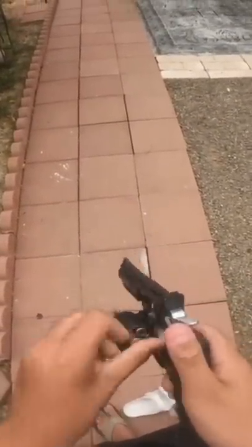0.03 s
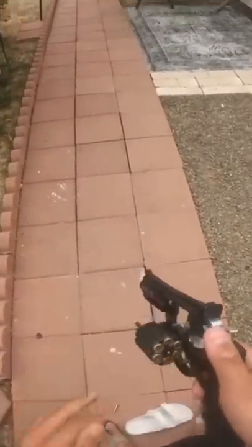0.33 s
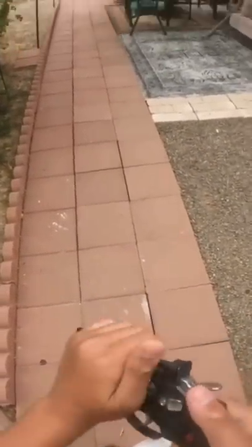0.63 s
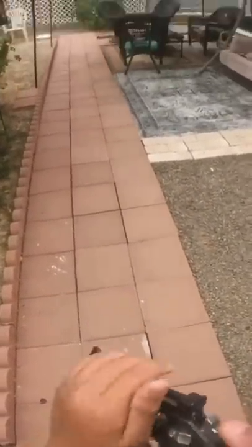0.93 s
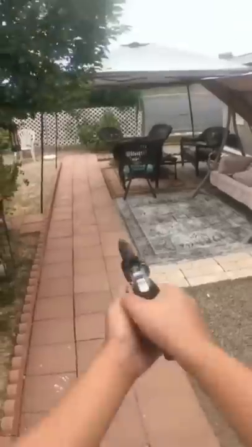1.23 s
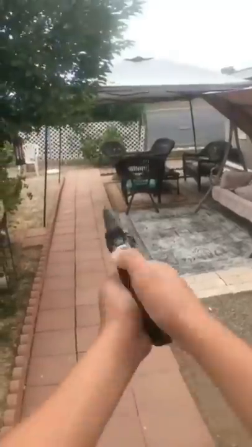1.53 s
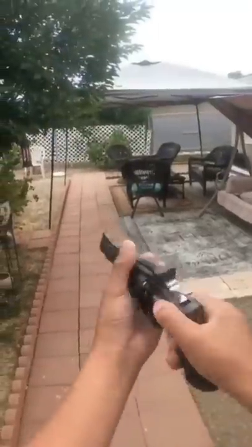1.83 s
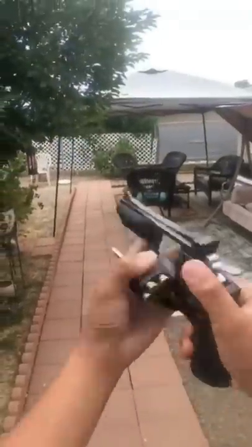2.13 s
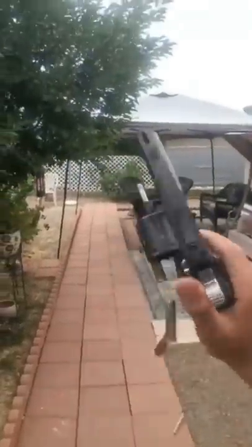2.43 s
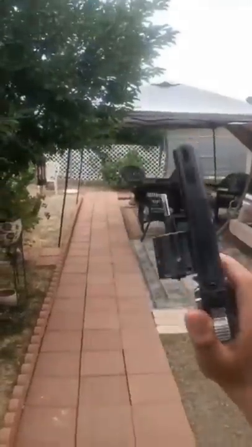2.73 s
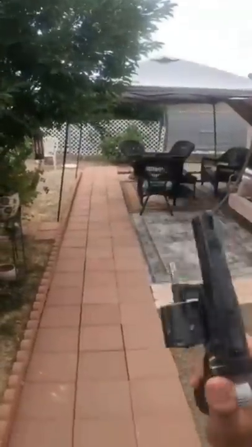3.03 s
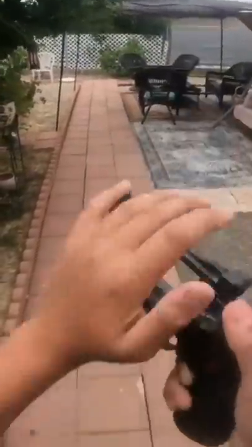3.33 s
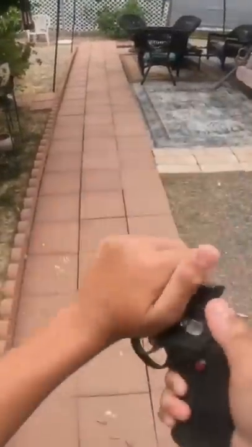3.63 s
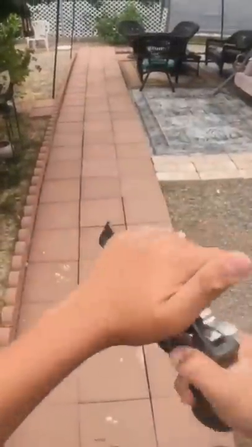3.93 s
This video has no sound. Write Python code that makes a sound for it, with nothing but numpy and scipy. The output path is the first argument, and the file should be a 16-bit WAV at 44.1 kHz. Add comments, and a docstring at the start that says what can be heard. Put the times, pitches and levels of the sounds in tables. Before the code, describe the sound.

A revolver clicks and scrapes close by, its cylinder snapping in sharply around 0.7 seconds, with another click near 1.1. More steel clicks from 1.7 build to a rattle around 2.2 as the cases are ejected. Three brass cases bounce and ring on paving from 2.7 to 3.4. The cylinder snaps shut at 3.6 with a low microphone bump. A low outdoor rumble continues throughout.

```python
"""Sharp steel clicks over a low outdoor rumble: a revolver is handled close by in a paved back yard.
Latch, cylinder and hammer strike and ring the frame; sliding parts stick and slip. A faint bird whistles.
The ejector rattles three cases out; they bounce, tumble and ring on the paving. The cylinder snaps shut.
The hand jolts the microphone twice; hands, ground and fences reflect gun and cases."""
import sys
import numpy as np
from scipy import signal
from scipy.fft import rfft, irfft, next_fast_len
from scipy.io import wavfile

SR = 44100
rng = np.random.default_rng(int(sys.argv[2]) if len(sys.argv) > 2 else 0)


def store_wav(level_fs):
    """Save 16-bit WAV to argv[1]."""
    pcm = np.round(np.clip(np.atleast_2d(level_fs), -1, 1) * 32767)
    wavfile.write(sys.argv[1], SR, pcm.T.astype(np.int16))


N = 176400

# outdoor rumble and hiss (frequency [Hz], relative level [dB])
AIR_SPECTRUM = [(13, -32.5), (22, 3), (60, -9), (157, -11), (271, -23.5), (450, -26.5), (724, -31),
                (978, -24), (1740, -36.5), (3830, -53.5), (4770, -47.5), (15000, -79.5)]
# steel parts meeting (time [s], contact time constant [s], level in each of four bands [dB])
STEEL_CLICKS = [(0.1084, 0.0014, -37, -25.5, -31, -41.5), (0.1306, 0.0013, -44, -32.5, -45.5, -45),
                (0.2012, 0.0024, -34.5, -38.5, -36, -37), (0.2425, 0.0054, -39.5, -35, -36.5, -42),
                (0.2997, 0.00097, -34.5, -29.5, -34.5, -44), (0.3339, 0.0011, -53.5, -36.5, -47, -51),
                (0.626, 0.0029, -32, -36, -41, -49), (0.645, 0.0014, -27, -24, -17.5, -28.5),
                (0.6495, 0.0039, -30.5, -27.5, -33, -38), (0.7083, 0.0036, -26, -23, -18.5, -48),
                (0.7122, 0.0022, -33, -26, -26, -28), (0.9688, 0.0012, -45, -36, -45, -59),
                (0.9953, 0.0024, -41.5, -40, -34, -34), (1.0734, 0.00025, -28.5, -26, -22.5, -27),
                (1.7173, 0.0014, -44.5, -31, -31, -39.5), (1.872, 0.0022, -31.5, -32.5, -25, -33.5),
                (1.9568, 0.0014, -38, -35.5, -37, -41), (1.9655, 0.004, -41.5, -57.5, -35.5, -46),
                (2.029, 0.00034, -38, -44, -31, -50), (2.096, 0.00066, -42, -39.5, -30.5, -53),
                (2.1091, 0.00072, -44.5, -35, -33, -27), (2.1163, 0.0061, -32, -30, -23, -34),
                (2.189, 0.003, -25, -31, -41, -49), (2.1931, 0.0047, -23.5, -26.5, -27, -36.5),
                (2.2388, 0.0019, -32, -32.5, -39, -48), (2.262, 0.0027, -37, -41, -30.5, -40),
                (2.2759, 0.0024, -31.5, -27.5, -28.5, -31), (2.2838, 0.002, -28, -26.5, -33, -32),
                (2.3056, 0.0031, -31.5, -28.5, -27, -35.5), (2.3588, 0.001, -39.5, -36.5, -39, -51),
                (2.385, 0.0036, -37, -32.5, -33.5, -46), (2.4924, 0.0023, -44, -40, -46, -51.5),
                (3.473, 0.00099, -40, -35.5, -36.5, -60), (3.5019, 0.0037, -27, -29, -24, -31),
                (3.5857, 0.0026, -24.5, -26.5, -19.5, -37), (3.5947, 0.0031, -27.5, -25.5, -19.5, -26)]
# the four bands (low edge [Hz], high edge [Hz])
BANDS_HZ = [(760, 1650), (1750, 3500), (3600, 7600), (8300, 13500)]
# hand-damped frame (frequency [Hz], relative level [dB], t60 [s])
FRAME_MODES = [(1105, -6.5, .018), (1866, -15, 0.046), (2144, -0.5, 0.019), (4330, 3, 0.0063),
               (6380, -4.5, .018)]
# metal scraping (time [s], length [s] capped at 0.5, level [dB], tilt [dB/octave])
SCRAPES = [(0.149, 0.19, -50, 5), (0.57, 0.058, -41.5, -3), (0.681, 0.065, -37.5, -2),
           (0.851, 0.37, -46, -1.5), (1.057, .009, -33.5, 7.5), (1.48, 0.013, -48, 2.5),
           (1.758, .014, -43.5, -3), (1.821, 0.31, -47, 2), (2.016, 0.027, -37, 0),
           (2.186, 0.26, -40.5, 2.5), (2.266, 0.068, -33, 1.5), (3.168, 0.73, -45, -3),
           (3.566, 0.038, -26, 1), (3.933, 0.015, -41.5, -6.5)]
# scrape before tilt (frequency [Hz], relative level [dB])
SCRAPE_SPECTRUM = [(400, -22.5), (1300, -0.5), (6500, -4.5), (9000, -16), (12500, -13.5)]
# a light touch ticks, a hard push scrapes densely (scrape level [dB], slip spread [dB])
SLIP_SPREAD = [(-46, 9.5), (-36, 5.5)]
# latch and lock springs (time [s], frequency [Hz], level [dB])
SPRING_RINGS = [(.244, 2410, -26), (.61, 2440, -33), (1.898, 2180, -33), (1.957, 2137, -31)]
# bird (time [s], length [s], start pitch [Hz], middle pitch [Hz], end pitch [Hz], level [dB])
BIRD_WHISTLES = [(.455, .11, 5400, 6700, 6300, -55)]
# cylinder seating (time [s], level [dB])
SEAT_KNOCKS = [(.646, -28), (.711, -30), (3.595, -30.5)]
# hand jolting the microphone (time [s], level [dB])
MIC_JOLTS = [(1.077, -29), (3.596, -20)]
# ring per case (frequency [Hz], relative level [dB], t60 [s] before RING_T60_SCALE)
BRASS_MODES = { "first": [(1039, -11, .27), (1537, -10, .19), (2490, -4, .11), (4075, -6, .12),
               (4621, -3, .14), (4948, -1, .1), (6492, -3, .065), (7736, -6, .06)],
               "second": [(1608, -8, .25), (2612, -11, .2), (4295, -1, .13), (5197, -7, .13),
               (6794, -6, .08), (7456, -2, .1), (9865, -6, .085), (11220, -5, .05)],
               "third": [(1571, -4.5, .28), (2575, -2, .13), (4305, -8, .15), (4392, -9, .1),
               (6705, -1, .085), (8040, -6, .07), (11740, -7, .055)]}
# bounces per case (time [s], relative ring level [dB], tilt [dB/octave], relative tick level [dB])
CASE_BOUNCES = {"first": [(2.6667, -23, -2.5, -31), (2.672, -21, -3, -37.5), (2.7785, -18, -0.7, -17.5)],
                "second": [(2.8518, -19, 0, -20.5), (2.8905, -30.5, 7.5, -19.5),
                (2.9392, -28.5, -6.5, -18.5), (2.9984, -24, 1.5, -22), (3.1773, -31, -3.5, -34),
                (3.3906, -31, 0.5, -28), (3.4474, -40, -4.5, -36.5)], "third": [(3.0847, -19, -2, -23),
                (3.2037, -30.5, -4, -24.5), (3.2113, -23.5, -1, -30), (3.2379, -27.5, -5.5, -24),
                (3.2771, -31.5, 2.5, -27), (3.3449, -36, 8, -27)]}
# crowd of weak high overtones after a bounce (frequency [Hz], relative level [dB])
SHIMMER_SPECTRUM = [(800, -21.5), (7000, 12.5), (9000, 2), (12500, 1)]
# brass on stone (frequency [Hz], relative level [dB])
TICK_SPECTRUM = [(150, -3), (6000, 3), (12500, -4.5)]
# low knock per case (offset from the bounce's tick level [dB])
CASE_KNOCK_DB = {"first": -25, "second": -0.5, "third": 0.5}
# gun position (frequency [Hz], left minus right [dB])
GUN_PAN = [(5000, -2), (11000, 1.5)]
# gun's lag on the left (frequency [Hz], phase [rad])
GUN_LAG = [(1100, .22), (2100, 0.93), (4200, .1)]
# case position (frequency [Hz], left minus right [dB])
CASE_PAN = [(4000, 1.5), (11000, 3.2)]
# reflections (frequency [Hz], relative level [dB])
ECHO_SPECTRUM = [(200, -14), (1100, -0.5), (12000, -13)]

LEAD_S, RUB_DB, RUB_S = .008, -18, .0017  # parts rub just before they meet
RING_DB, RING_T60_SCALE, RING_RISE_S, MODE_SCATTER_DB = -1, .89, .00068, 1.5
TUMBLE_HZ, TUMBLE_DEPTH = 36, .45
SHIMMER_DB, SHIMMER_T60_S = -15.5, .16
TICK_DB, TICK_S = -1.5, .0017


def undb(db):
    """Decibels to gain."""
    return 10 ** (np.asarray(db) / 20)


def unit(x):
    """Scale to rms 1."""
    return x / np.sqrt(np.mean(x ** 2) + 1e-20)


def seconds(length_s):
    """Time axis."""
    return np.arange(int(length_s * SR)) / SR


def fade(t, t60_s):
    """Decay by 60 dB in t60_s."""
    return np.exp(-np.log(1000) * t / t60_s)


def burst(x):
    """Scale to the energy of 5 ms at rms 1."""
    return x * np.sqrt(.005 * SR / np.sum(x ** 2))


def add(out, start_s, x):
    """Mix x in at start_s."""
    i = max(int(start_s * SR), 0)
    out[i:i + len(x)] += x[:max(N - i, 0)]


def colour(x, points):
    """Minimum-phase filter through (frequency [Hz], gain [dB]) points."""
    size = next_fast_len(len(x) // 2 + 2048) * 2
    hz, db = np.array(points).T
    bins_hz = np.maximum(np.arange(size // 2 + 1) * SR / size, 1)
    gain = undb(np.interp(np.log(bins_hz), np.log(hz), db))
    cepstrum = irfft(np.log(gain))
    cepstrum[1:size // 2] *= 2
    cepstrum[size // 2 + 1:] = 0
    return irfft(rfft(x, size) * np.exp(rfft(cepstrum)))[:len(x)]


def ping(hz, t60_s):
    """One struck resonance."""
    t = seconds(.5)
    return np.sin(2 * np.pi * hz * t) * fade(t, t60_s)


def air(level_db=-39, sway_db=.4):
    """Outdoor rumble and faint hiss, gently swaying, wider in the treble."""
    mid, side = (unit(colour(rng.standard_normal(N), AIR_SPECTRUM)) for _ in range(2))
    side = colour(side, [(150, 20 * np.log10(.091)), (1200, 20 * np.log10(.42))])
    sway = np.interp(np.arange(N), np.linspace(0, N, num=24), rng.standard_normal(24))
    return undb(level_db + sway_db * sway) * np.array([mid + side, mid - side])


def grit(count, grain):
    """Noise of many tiny contacts of unequal size."""
    noise, log_size = rng.standard_normal((2, count))
    return noise * np.exp(grain * np.repeat(log_size, 12)[:count])


def contact(decay_s, rise_s=.00022):
    """Force of one blow: a light rub, then at LEAD_S a fast rise and dying chatter."""
    t = seconds(.06) - LEAD_S
    after_s = np.maximum(t, 0)
    blow = np.minimum(after_s / rise_s, 1) * np.exp(-after_s / decay_s)
    rub = undb(RUB_DB) * np.exp(-abs(t) / RUB_S)
    return grit(len(t), grain=.3) * (blow + rub)


def clicks(crack_db=31):
    """Each steel contact cracks and briefly rings the frame, with its own band levels."""
    out, t = np.zeros(N), seconds(.06)
    frame = sum(undb(db) * np.cos(2 * np.pi * hz * t) * fade(t, t60_s) for hz, db, t60_s in FRAME_MODES)
    frame[0] += undb(crack_db)
    bands = [signal.butter(3, edges, "band", fs=SR, output="sos") for edges in BANDS_HZ]
    for start_s, decay_s, *levels_db in STEEL_CLICKS:
        blow = signal.fftconvolve(contact(decay_s), frame)[:len(t)]
        click = sum(undb(db) * burst(signal.sosfilt(band, blow)) for band, db in zip(bands, levels_db))
        add(out, start_s - LEAD_S, click)
    return out


def scrapes(slip_s=.0025):
    """Cylinder, ejector rod and cases slide, sticking and slipping in tiny ticks."""
    out, t = np.zeros(N), seconds(.5)
    for start_s, length_s, db, tilt_db_oct in SCRAPES:
        count = len(seconds(min(length_s, .5)))
        spread_db = np.interp(db, *np.array(SLIP_SPREAD).T)
        slips = undb(spread_db * rng.standard_normal(len(t)))[(t / slip_s).astype(int)]
        friction = grit(len(t), grain=.17) * slips
        spectrum = [(hz, base_db + tilt_db_oct * np.log2(hz / 1000)) for hz, base_db in SCRAPE_SPECTRUM]
        scrape = unit(colour(friction, spectrum)[:count])
        add(out, start_s, undb(db) * scrape * np.hanning(count) ** .5)
    return out


def springs():
    """Latch and lock springs ring briefly."""
    out = np.zeros(N)
    for start_s, hz, db in SPRING_RINGS:
        add(out, start_s, undb(db) * ping(hz, t60_s=.046))
    return out


def bird(jitter=.09):
    """A thin, near-pure whistle arches through three pitches."""
    out = np.zeros(N)
    for start_s, length_s, *pitches_hz, db in BIRD_WHISTLES:
        progress = seconds(length_s) / length_s
        arch_hz = np.polyval(np.polyfit([0, .5, 1], pitches_hz, 2), progress)
        hz = arch_hz * (1 + jitter * rng.standard_normal(SR)[:len(progress)])
        tone = np.sin(2 * np.pi * np.cumsum(hz) / SR)
        add(out, start_s, undb(db) * np.sin(np.pi * progress) * tone)
    return out


def cylinder_knocks():
    """The cylinder knocks as it seats in the frame."""
    out = np.zeros(N)
    for start_s, db in SEAT_KNOCKS:
        add(out, start_s, undb(db) * ping(hz=660, t60_s=.031))
    return out


def jolts(hz=32.4, decay_s=.015):
    """The hand jolts the microphone: a deep wobble."""
    out, t = np.zeros(N), seconds(.62)
    for start_s, db in MIC_JOLTS:
        add(out, start_s, undb(db) * np.sin(2 * np.pi * hz * t) * np.exp(-t / decay_s))
    return out


def cases():
    """Each bounce on stone ticks, knocks, shimmers and rings a fresh mix of modes; tumbling flutters it."""
    out, t = np.zeros(N), seconds(.5)
    attack = np.minimum(t / RING_RISE_S, 1)
    for name, bounces in CASE_BOUNCES.items():
        hz, mode_db, t60_s = np.array(BRASS_MODES[name]).T[:, :, None]
        octaves = np.log2(hz / 4000)
        for start_s, ring_db, tilt_db_oct, tick_db in bounces:
            scatter, phase, spin, facing = rng.standard_normal((4, len(hz), 1))
            gains = undb(RING_DB + ring_db + mode_db + tilt_db_oct * octaves + MODE_SCATTER_DB * scatter)
            flutter = 1 + TUMBLE_DEPTH * np.sin(2 * np.pi * (TUMBLE_HZ * 2 ** (spin / 2) * t + facing))
            modes = np.sin(2 * np.pi * (hz * t + phase)) * fade(t, t60_s * RING_T60_SCALE)
            ring = (gains * flutter * modes).sum(axis=0)
            overtones = rng.standard_normal(len(t)) * fade(t, SHIMMER_T60_S)
            shimmer = undb(SHIMMER_DB + tick_db) * burst(colour(overtones, SHIMMER_SPECTRUM))
            tick = undb(TICK_DB + tick_db) * burst(colour(contact(TICK_S), TICK_SPECTRUM))
            knock = undb(CASE_KNOCK_DB[name] + tick_db) * ping(hz=239, t60_s=.0049)
            add(out, start_s - LEAD_S, tick)
            add(out, start_s, (ring + shimmer) * attack + knock)
    return out


def pan(x, balance):
    """Split between left and right by frequency."""
    return np.array([colour(x, [(hz, sign * db / 2) for hz, db in balance]) for sign in (1, -1)])


def lag_left(pair, points):
    """Delay the left channel by a frequency-dependent phase."""
    left, right = pair
    hz, lag_rad = np.array(points).T
    phase_rad = np.interp(np.arange(N // 2 + 1) * SR / N, hz, lag_rad)
    return np.array([irfft(rfft(left) * np.exp(-1j * phase_rad), N), right])


def echoes(x, db, t60_s):
    """Diffuse reflections, different at each ear."""
    t = seconds(.94)
    envelope = fade(t, t60_s) * (t > .002)
    tails = [colour(rng.standard_normal(len(t)) * envelope, ECHO_SPECTRUM) for _ in range(2)]
    return undb(db) * np.array([signal.fftconvolve(x, tail / np.linalg.norm(tail))[:N] for tail in tails])


def scene():
    """Gun and cases, their reflections from hands, ground and fences, bird, jolts and outdoor air."""
    steel = clicks() + scrapes() + springs() + cylinder_knocks()
    brass = cases()
    direct = lag_left(pan(steel, GUN_PAN), GUN_LAG) + pan(brass, CASE_PAN)
    near = echoes(steel + brass, db=-16, t60_s=.084)
    yard = echoes(steel + brass, db=-18, t60_s=.24)
    return direct + near + yard + bird() + jolts() + air()


def record(dry):
    """The microphone dulls the very top and cuts it off."""
    rolloff_hz, cutoff_hz = 13200, 16400
    dulled = signal.sosfilt(signal.butter(12, rolloff_hz, fs=SR, output="sos"), dry)
    return signal.sosfilt(signal.ellip(8, .2, 70, cutoff_hz, fs=SR, output="sos"), dulled)


dry = scene()
out = record(dry)
store_wav(out)
```